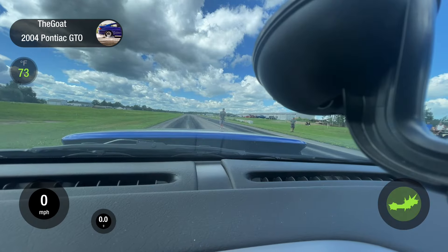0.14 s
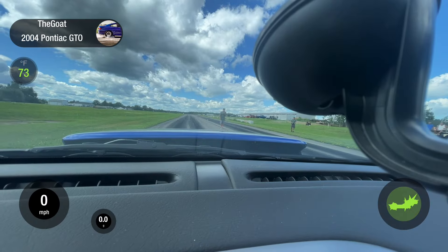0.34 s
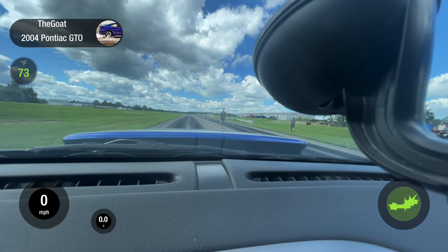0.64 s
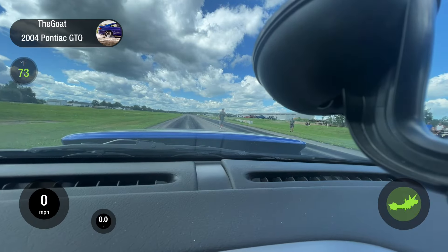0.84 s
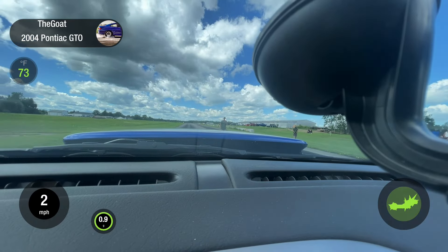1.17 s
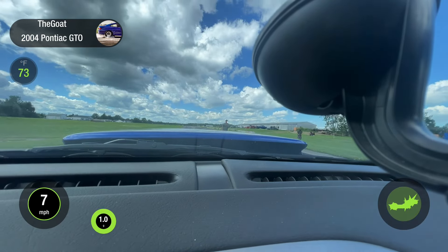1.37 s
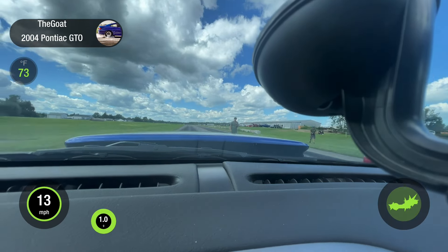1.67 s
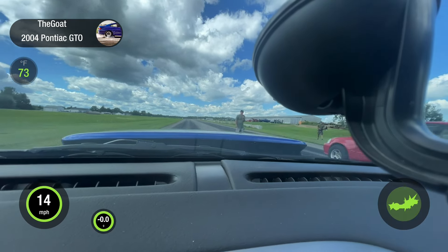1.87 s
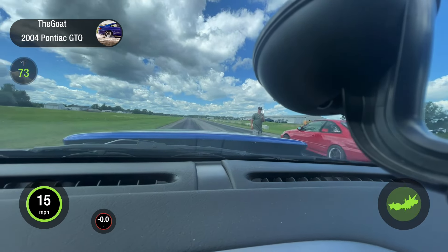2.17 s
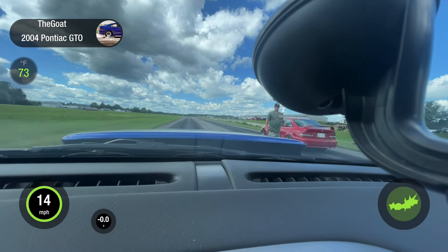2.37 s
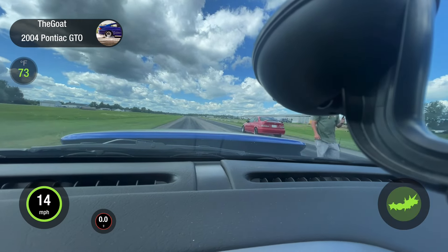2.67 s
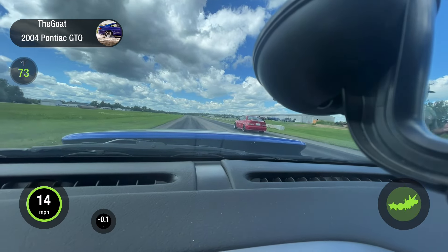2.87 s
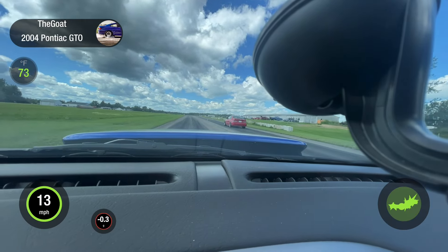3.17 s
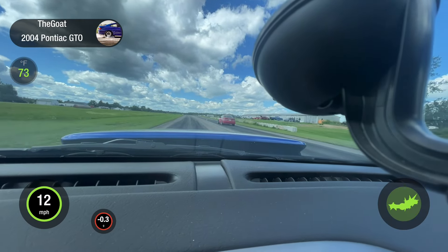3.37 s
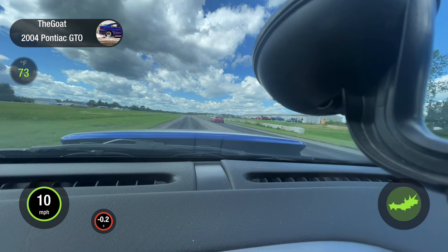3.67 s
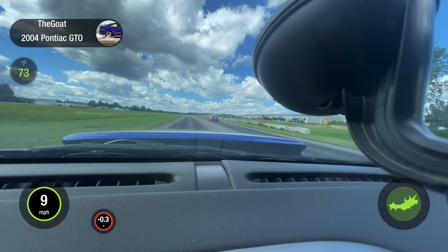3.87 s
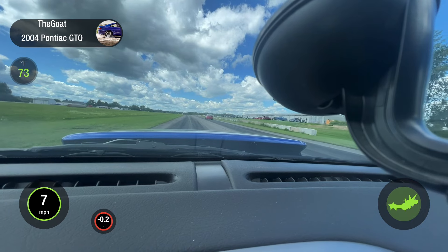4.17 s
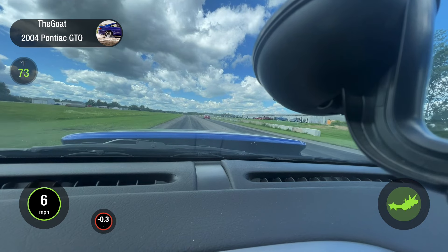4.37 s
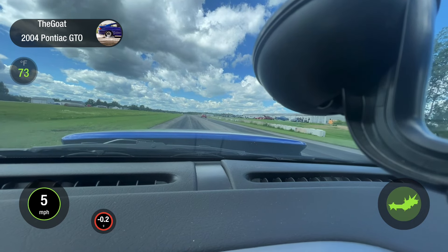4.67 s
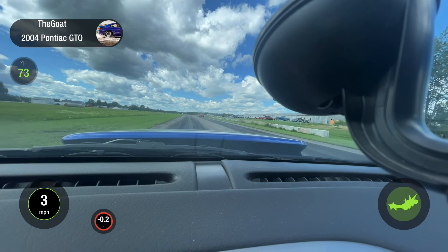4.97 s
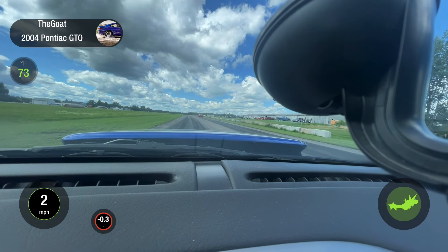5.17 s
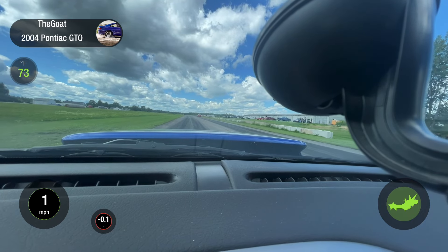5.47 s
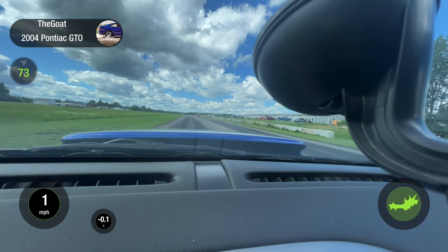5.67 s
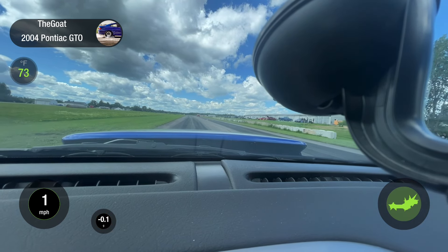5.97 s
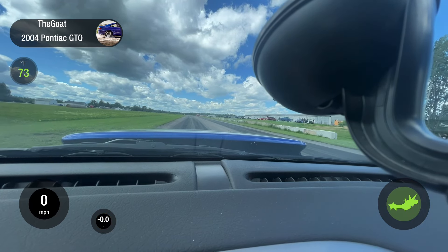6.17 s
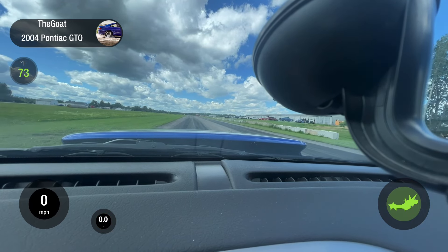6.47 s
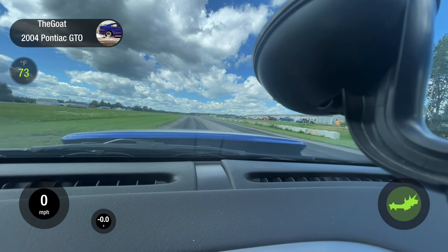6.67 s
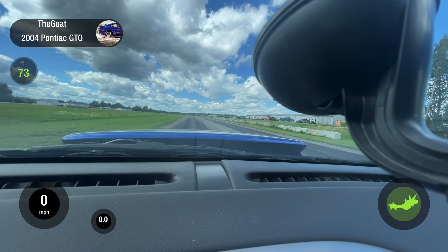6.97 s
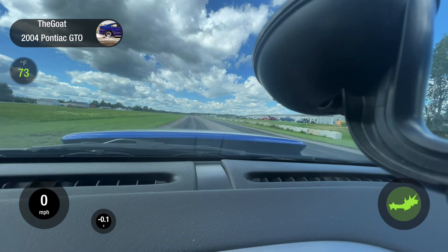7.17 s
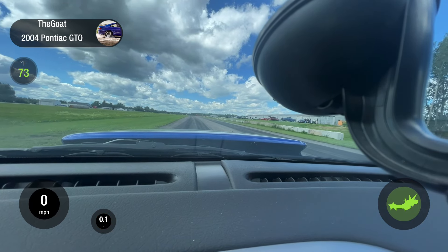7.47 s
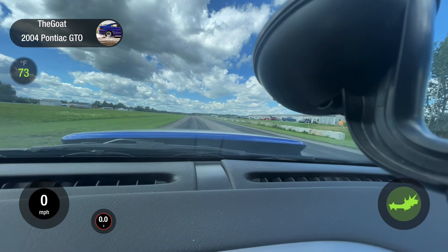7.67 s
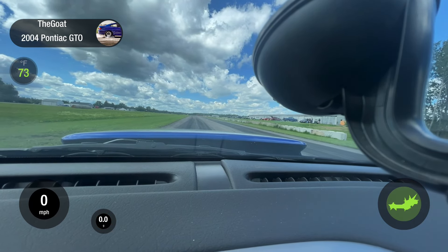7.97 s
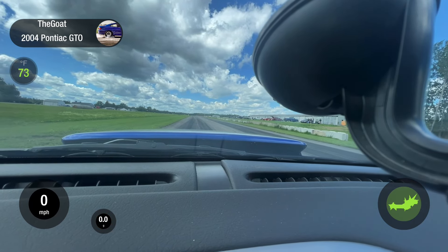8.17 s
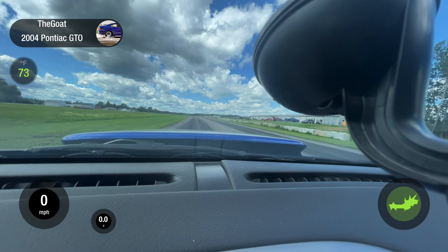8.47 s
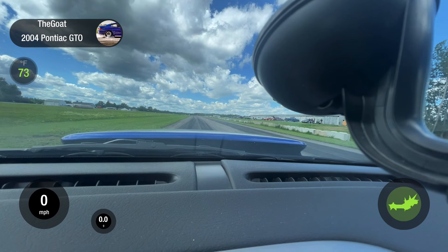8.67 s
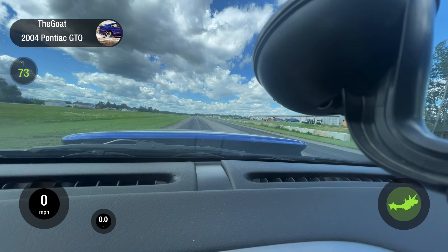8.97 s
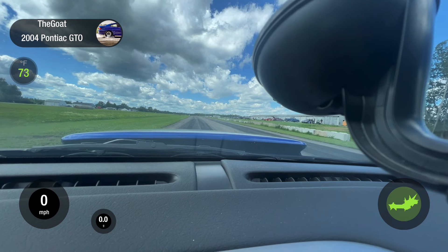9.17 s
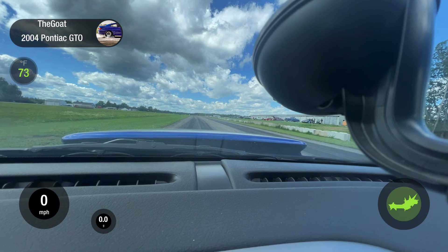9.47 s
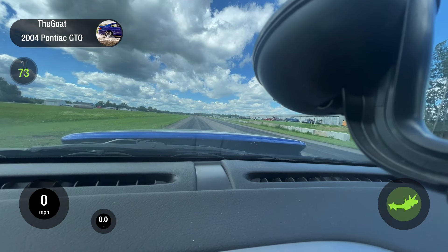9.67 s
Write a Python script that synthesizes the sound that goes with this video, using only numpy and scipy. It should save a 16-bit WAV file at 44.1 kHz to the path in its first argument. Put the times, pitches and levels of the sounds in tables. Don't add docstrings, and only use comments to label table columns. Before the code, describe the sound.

Microphone on the dashboard of a closed car cabin, dense and boomy, with loud peaks flattened. From 0 to 0.75 s the engine is held on a launch limiter: uneven cracks and ringing exhaust pops over whining blower rotors. It then pulls, roar and piercing whine rising, hiss and trim buzz growing; a hard bang at 1.6 s, a tiny ignition cut at 1.7, then a scream peaking near 2.0. Another car's exhaust note climbs alongside from 1.65 to 1.95. The throttle lifts and pitch glides down, the roar fading by 3.5 with a small pop, into a humming idle; the other car is faint and distant from 3.6 to 5.7. At 5.6 a quick blip raises the revs, which hold, lumpy and wavering, until about 8, then sink to low idle by 9.3. Small plastic clicks snap close at 8.45, 9.25, 9.4 and 9.7.

```python
import sys
import numpy as np
from scipy import signal
from scipy.fft import rfft, irfft, next_fast_len
from scipy.io import wavfile
from scipy.ndimage import uniform_filter1d, map_coordinates

SR = 44100
rng = np.random.default_rng(int(sys.argv[2]) if len(sys.argv) > 2 else 0)


def level_to_linear(level):
    exponent = np.asarray(level, float) / 20
    return 10 ** exponent


def persist_wave(psi):
    counts = np.round(np.clip(psi, -1, 1) * 32767).astype(np.int16)
    wavfile.write(sys.argv[1], SR, np.atleast_2d(counts).T)


N = 433503
TIME = np.arange(N) / SR
PART_DB = -28


def unit(x):
    return x / np.sqrt(np.mean(x ** 2) + 1e-20)


def steady(x, seconds=0.16):
    return x / np.sqrt(np.abs(uniform_filter1d(x ** 2, int(seconds * SR))) + 1e-12)


def along(points, hz):
    f, db = np.transpose(points)
    return level_to_linear(np.interp(np.log(hz + 1), np.log(f + 1), db, left=-90, right=-90))


def curves(rows):
    s, *columns = np.transpose(rows)
    return [np.interp(TIME, s, c) for c in columns]


def noise():
    return rng.standard_normal(N)


def wobble(rate):
    knots = rng.standard_normal(int(N * 400 / SR) + 4)
    return map_coordinates(knots, [np.arange(N) * rate / SR])


def filtered(x, response):
    m = next_fast_len(N + SR // 2)
    return irfft(rfft(x, m) * response(np.fft.rfftfreq(m, 1 / SR)), m)[:N]


def tone(turns, shake_db, rate, locked=False):
    start = .09 * wobble(3) if locked else rng.random()
    return np.sqrt(2) * level_to_linear(shake_db * wobble(rate)) * np.sin(2 * np.pi * (turns + start))


# (centre [Hz], width [Hz], level over the noise [dB])
PANEL_MODES = [(296.5, 58, 11.5), (425, 16, 15), (511, 26, 9.5), (685, 6.6, 7.5), (737, 34, 6.5),
               (902, 14, 8.5), (1010, 26, 3), (1107, 38, 4), (1221, 42, 11), (1340, 31, -8.5),
               (1651, 41, 12), (1900, 5, 15.5), (2167, 38, 9.5), (2290, 13, -0.5), (2500, 7.6, 11.5),
               (2750, 19, -2.5), (4520, 40, 8), (7630, 1200, -1.5)]


def panels(hz):
    return 1 + sum(level_to_linear(db) / (1 + ((hz - c) / (w / 2)) ** 2) for c, w, db in PANEL_MODES) / 2


# (time [s], firing rate [1/s])
DRIVEN_CRANK = [(.74, 102.3), (.95, 148.3), (1.14, 149.3), (1.3, 169.8), (1.5, 203.4), (1.9, 316),
                (2.03, 370), (5.62, 93.5), (5.92, 161.5), (6.1, 162.5), (6.45, 140), (7.2, 159.6),
                (7.55, 152.8), (7.95, 163), (8.55, 124.5), (9.0, 103), (9.35, 80.5), (9.75, 83)]


def crank():
    lift_s, pickup_s = 2.03, 5.5
    drag_s, drag_hz = 2.3, 85
    idle_hz, catch_hz = 89.5, 22
    driven, = curves(DRIVEN_CRANK)
    top = np.interp(lift_s, *np.transpose(DRIVEN_CRANK))
    free = (top + drag_hz) * np.exp(-(TIME - lift_s) / drag_s) - drag_hz
    coast = idle_hz + catch_hz * np.logaddexp(0, (free - idle_hz) / catch_hz)
    coasting = (TIME > lift_s) & (TIME < pickup_s)
    return uniform_filter1d(np.where(coasting, coast, driven), SR // 16, mode="nearest")


# (time [s], throttle [dB], lumpiness of the burn [dB])
ENGINE_LOAD = [(.75, -18.5, -11), (.9, -14, -10), (1.4, -15, -22), (1.6, -10.5, -9), (1.91, -13, -17.5),
               (1.95, -19, -11.5), (2.5, -23.5, -16), (3.0, -28, -17), (3.25, -35, -17.5),
               (3.6, -38.5, -18.5), (5.6, -39.5, -18.5), (5.82, -25.5, -14), (6.0, -31.5, -14),
               (6.5, -31, -10.5), (6.8, -28.5, -12.5), (8.3, -26, -11), (8.6, -29, -13.5),
               (9.83, -34.5, -16)]


def throttle():
    cut_s, cut_length_s, cut_db = 1.715, .065, -11
    open_db, lump_db = curves(ENGINE_LOAD)
    t = TIME - cut_s
    cut = uniform_filter1d(1. * (t > 0) * (t < cut_length_s), SR // 60)
    return open_db + cut_db * cut, lump_db


def on_limiter():
    return TIME < .76


# (centre [Hz], width [Hz], level [dB])
AIR_MODES = [(88.5, 17.3, -10.5), (110, 40, -16), (130.1, 27.3, -9), (161.5, 24.7, -18), (174, 35.5, -13.5),
             (244, 67, -20.5), (299.7, 37.3, -20), (329.3, 17, -20.5), (405, 100, -21), (487, 55, -8)]


def cabin(hz):
    gains = [level_to_linear(db) / (1 + ((hz - c) / (w / 2)) ** 2) ** 1.25 for c, w, db in AIR_MODES]
    return np.sqrt(sum(gain ** 2 for gain in gains))


def firing_tones(hz, fired, speeding, roar_db):
    over_db = roar_db - PART_DB
    slowing = uniform_filter1d(np.clip(-speeding, 0, None), SR // 10)
    spin_db = -20.5 * uniform_filter1d(1. * (TIME > 1.596) * (TIME < 2.12), SR // 12)
    first = level_to_linear(.45 * over_db - 6.5 * slowing + spin_db) * cabin(hz)
    second = level_to_linear(-7 + .67 * over_db - 31.5 * slowing + spin_db) * cabin(2 * hz)
    third = level_to_linear(1.85 * roar_db + 6.5) / (1 + ((3 * hz - 505) / 70) ** 2) ** 2
    out = first * tone(fired, shake_db=.64, rate=18, locked=True)
    out += second * tone(2 * fired, shake_db=4.5, rate=11)
    return out + third * tone(3 * fired, shake_db=6, rate=16)


LOPE_ORDERS = [-18, 0.5, -4.5, 0.5, -6, 4, -13, -28, -3, 6, -0.5, -4, -1.5, 1, -11, -28.5, -22, 5, -11,
               -15.5, -10.5, -0.5, -13.5, -4.5]
# (frequency [Hz], level per Hz [dB])
CABIN_BOOM = [(15, -37.5), (25, -37.5), (58, -2.5), (113, -0.5), (155, -4), (186, -3.5), (202, -24),
              (243, -26), (270, -38.5), (328, -29.5), (400, -25), (520, -40), (880, -120)]


def cabin_boom(fired, burn, firing, boom_db):
    lope = 0
    for i, db in enumerate(LOPE_ORDERS):
        k = (i + 1) / 8
        locked = k % .25 == 0 and k < 1.6
        lope = lope + level_to_linear(db) * along(CABIN_BOOM, k * (crank())) ** .71 * tone(k * fired, 5.5, 5, locked)
    thud = filtered(steady(burn * firing) + .41 * noise(), lambda f: along(CABIN_BOOM, f))
    boom = .86 * steady(lope) + .5 * steady(thud)
    return level_to_linear(2.03 * wobble(13) + boom_db - 4) * boom


STROKES = [1, .45, .9, .7, 1, .3, .8, .55]
# (frequency [Hz], level per Hz [dB])
ROAR_BAND = [(130, -34.5), (220, -1.5), (250, -8.5), (320, -5), (570, -12), (740, -13), (1050, -19),
             (1440, -35), (1650, -38.5), (3500, -40.5), (5200, -68.5)]


def exhaust_roar(stroke, burn, firing, puff, roar_db):
    unequal = (STROKES - np.mean(STROKES))[stroke % len(STROKES)]
    beats = steady(firing * (unequal + .1 * burn))
    echo_s = np.arange(SR // 20) / SR
    echoes = rng.standard_normal(len(echo_s)) * level_to_linear(-60 * echo_s / .06)
    beats = unit(signal.fftconvolve(beats, echoes)[:N])
    exhaust = .7 * beats + .7 * puff * noise()
    roar = filtered(exhaust, lambda f: along(ROAR_BAND, f) * panels(f))
    return level_to_linear(roar_db - 3.5 + .15 * wobble(20)) * steady(roar)


# (frequency [Hz], level per Hz [dB])
HISS_BAND = [(760, -34), (1300, -7), (1620, -11.5), (1840, -9), (2160, -12), (2460, -12.5), (4880, -21.5),
             (13300, -32), (14000, -26.5)]


def intake_hiss(puff, speeding, roar_db):
    level_db = -56 + .93 * (roar_db - PART_DB) - 7 * on_limiter()
    level_db += .5 * np.clip(speeding, 0, None)
    hiss = filtered(puff * noise(), lambda f: along(HISS_BAND, f) * panels(f))
    return level_to_linear(level_db + 8 + .55 * wobble(4.8)) * steady(hiss)


# (frequency [Hz], level per Hz [dB])
IDLE_BAND = [(710, -36.5), (1200, -13.5), (1780, -7.5), (2170, -2.5), (2400, 3.5), (9000, -21.5),
             (11700, -53.5), (19800, -120)]


def valve_gear():
    return level_to_linear(-58.5) * unit(filtered(noise(), lambda f: along(IDLE_BAND, f) * panels(f)))


def engine():
    hz, (roar_db, boom_db) = crank(), throttle()
    fired = np.cumsum(hz) / SR
    speeding = np.gradient(np.log(hz)) * SR
    stroke = fired.astype(int)
    firing = np.diff(stroke, prepend=0) > 0
    burn = rng.standard_normal(4000)[stroke]
    puff = level_to_linear(.2 * burn) * (1 + .061 * np.cos(2 * np.pi * fired))
    out = firing_tones(hz, fired, speeding, roar_db)
    out += cabin_boom(fired, burn, firing, boom_db)
    out += exhaust_roar(stroke, burn, firing, puff, roar_db)
    return out + intake_hiss(puff, speeding, roar_db) + valve_gear()


# (frequency [Hz], level [dB])
ROTOR_GAIN = [(1700, -11), (2050, -9), (2300, -5.5), (2900, -7.5), (3550, 0), (4600, -15), (6200, -9.5),
              (8500, -10)]
# (frequency [Hz], level [dB])
DUCT_GAIN = [(3500, -22), (4600, -12), (5500, -17), (7000, -14), (8900, -25), (9300, -19), (9800, -26),
             (14000, -36)]


def blower():
    pulley = 22.55
    hz, open_db = pulley * crank(), throttle()[0]
    under_db = np.minimum(open_db - PART_DB, 0)
    shaft = np.cumsum(hz / pulley) / SR / 4
    pull = .06 * np.sin(2 * np.pi * shaft) + .07 * np.sin(6 * np.pi * shaft)
    turns = np.cumsum(hz * (1 + .006 * wobble(150))) / SR + pull
    out = along(ROTOR_GAIN, np.clip(hz, 1800, 8300)) * tone(turns, shake_db=3.2, rate=80)
    for k, drop_db in [(2, -4), (3, -6), (4, -2)]:
        held_db = 6 * on_limiter() * (-1) ** k
        level = level_to_linear(drop_db + k * .07 * under_db + held_db) * along(DUCT_GAIN, k * hz)
        out += level * tone(k * turns + .12 * wobble(280), shake_db=4, rate=69)
    boost_db = np.clip(open_db + 17 + 3, 0, 8) * np.clip((hz - 4000) / 500, -.6, 1)
    return level_to_linear(-47.5 + .82 * under_db + boost_db) * out


def bursts(events, rise):
    out, t = np.zeros((2, N + SR)), np.arange(SR // 2) / SR
    for s, db, rel_db, length in events:
        shape = np.clip(t / rise, 0, 1) * level_to_linear(-60 * t / max(length, .01))
        out[:, round(s * SR):][:, :len(t)] += level_to_linear([[db], [db + rel_db]]) * shape
    return out[:, :N]


# (time [s], peak [dB], pipe ring over peak [dB], length [s])
BANG_EVENTS = [(0.0, -13.5, 6, 0.21), (0.088, -18, 3.5, 0.54), (0.223, -13, 5.5, 0.44),
               (0.353, -16, -31, 0.27), (0.465, -9, 1, 0.2), (0.542, -21, -16, 0.98),
               (0.662, -11, -6, 0.13), (0.756, -23, 11.5, 1), (0.943, -18, 7, 0.023),
               (1.607, -5.5, -9, 0.067), (1.78, -19, -16, 0.48), (3.49, -19.5, 3, 0.2),
               (5.719, -38, 5, 0.16), (6.303, -31, 6.5, 0.17)]
# (frequency [Hz], level [dB])
BANG_BAND = [(120, -6), (220, 4), (500, 11.5), (1500, -2), (3500, -5.5), (6000, -19), (9000, -21),
             (11000, -29), (13800, -20)]


def bangs():
    crack, ring = bursts(BANG_EVENTS, rise=.001)
    shaken = filtered(noise(), lambda f: along(BANG_BAND, f) * panels(f))
    pipe = filtered(noise(), lambda f: 1 / (1 + ((f - 424) / 10) ** 2))
    return level_to_linear(-3) * crack * unit(shaken) + level_to_linear(-6) * ring * unit(pipe)


# (centre [Hz], width [Hz], level at part throttle [dB], growth [dB per dB of throttle])
LOOSE_TRIM = [(738, 56, -53.5, 0.13), (974, 54, -52, 1.26), (1412, 50, -64, 1.66), (2664, 100, -68, 1.56),
              (1606, 90, -59.5, 1.42), (2210, 150, -60, 1.33)]


def trim():
    over_db = throttle()[0] - PART_DB - 3.5 * on_limiter()
    out = np.zeros(N)
    for c, w, db, grows in LOOSE_TRIM:
        buzz = unit(filtered(noise(), lambda f: 1 / (1 + ((f - c) / (w / 2)) ** 2)))
        out += level_to_linear(db + grows * over_db + .52 * wobble(10)) * buzz
    return out


# (time [s], peak [dB], low band over peak [dB], length [s])
CLICK_EVENTS = [(8.456, -37.5, -4, 0.16), (9.227, -35.5, -4, 0.08), (9.258, -21, -12, 0.095),
                (9.385, -46, -20, 0.088), (9.407, -42, -7, 0.094), (9.422, -35, -6.5, 0.17),
                (9.693, -36, -8, 0.14), (9.732, -23.5, -7, 0.066), (9.7425, -28, 0, 0.14),
                (9.7694, -44, -21, 0.076), (9.7946, -36.5, -5, 0.21)]
# (frequency [Hz], level [dB])
SNAP_BAND = [(3000, -9), (5500, 3), (8500, 2), (10500, -6), (13000, 0), (14200, -1)]


def clicks():
    bright, low = bursts(CLICK_EVENTS, rise=.0027)
    snap = filtered(noise(), lambda f: along(SNAP_BAND, f))
    shell = filtered(noise(), lambda f: 1 / (1 + ((f - 3300) / 900) ** 2)
                     + .45 / (1 + ((f - 1620) / 90) ** 2))
    return level_to_linear(-6) * bright * unit(snap) + low * unit(shell)


# (time [s], exhaust note [Hz], level [dB])
RIVAL_GEARS = [
    [(1.64, 290, -17), (1.73, 316, -17)],
    [(1.775, 328, -9), (1.85, 380, -16), (1.92, 416, -11), (1.95, 412, -14)],
    [(3.6, 218, -44), (3.9, 231, -38), (4.3, 254, -38), (4.75, 250, -40)],
    [(5, 343, -50), (5.3, 356, -46), (5.7, 376, -47)],
]


def rival():
    out = np.zeros(N)
    for gear in RIVAL_GEARS:
        hz, db = curves(gear)
        start, end = gear[0][0], gear[-1][0]
        fade = np.clip(np.minimum(TIME - start, end - TIME) / (.12 * (end - start)), 0, 1)
        turns = np.cumsum(hz) / SR
        for k, drop_db in [(1, 0), (2, -21), (3, -20), (4, -28), (6, -30), (7, -30)]:
            out += fade * level_to_linear(db + drop_db) * tone(k * turns, shake_db=3, rate=20)
    return out


def scene():
    return (engine() + blower() + bangs() + trim() + clicks() + rival())[None]


def roll_off(x):
    return signal.sosfilt(signal.butter(12, 15130, fs=SR, output="sos"), x)


def record(dry):
    top = .67
    dry = dry * np.clip(TIME / .003, 0, 1)
    mix = dry / (1 + np.abs(dry / top) ** 5) ** (1 / 5)
    return roll_off(mix)


dry = scene()
out = record(dry)
persist_wave(out)
```